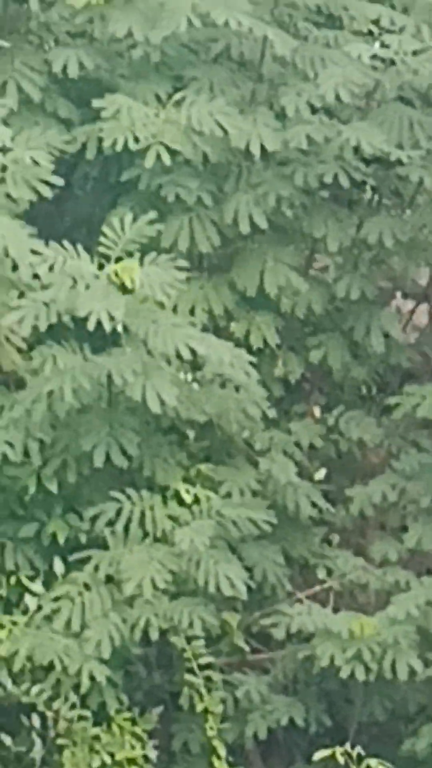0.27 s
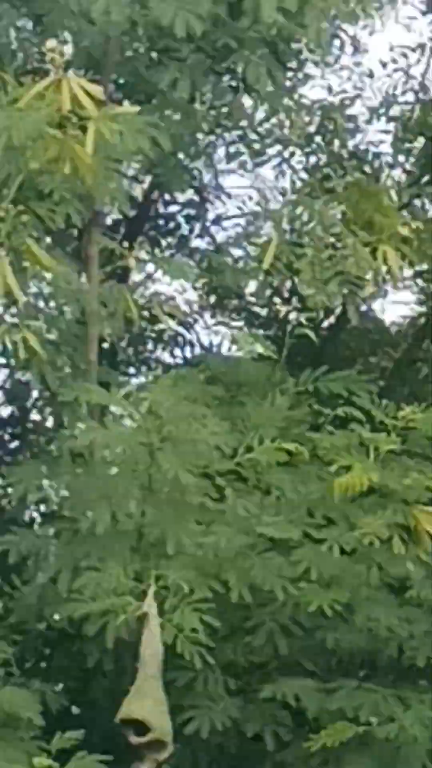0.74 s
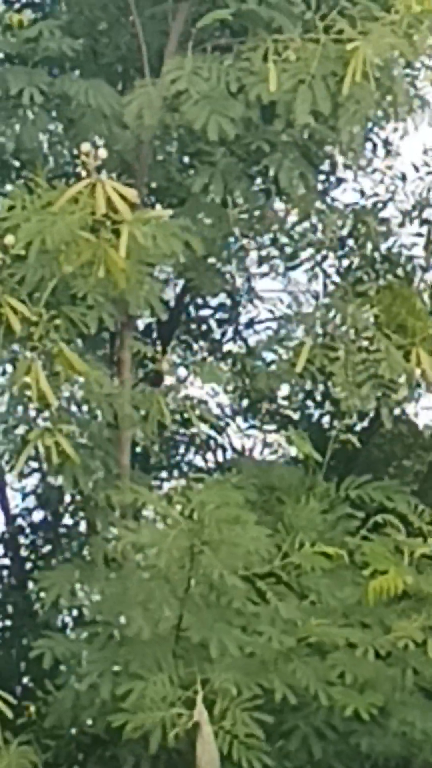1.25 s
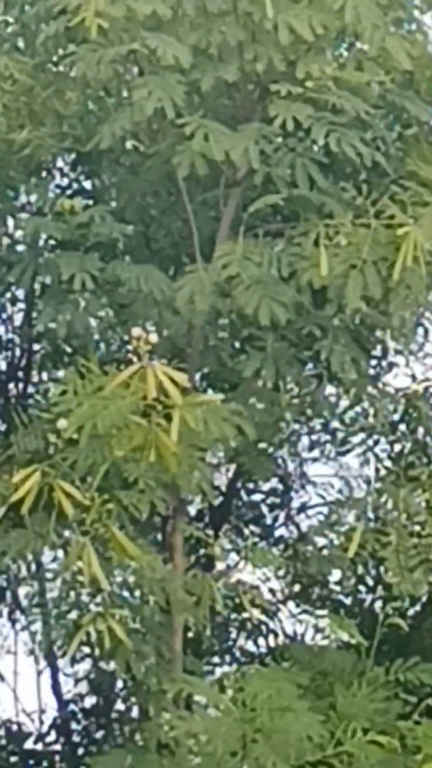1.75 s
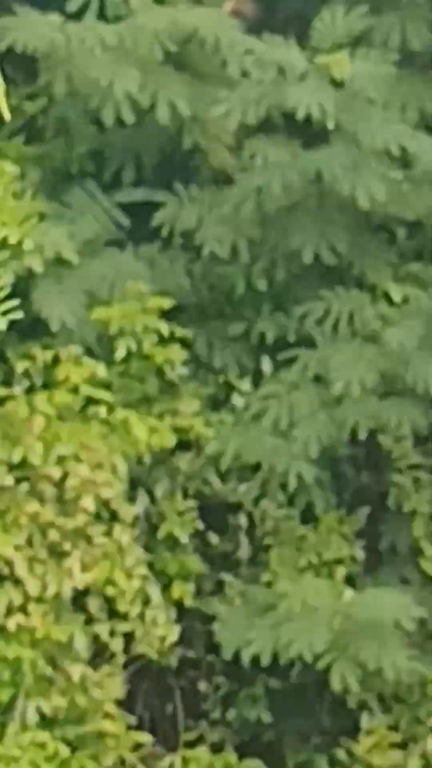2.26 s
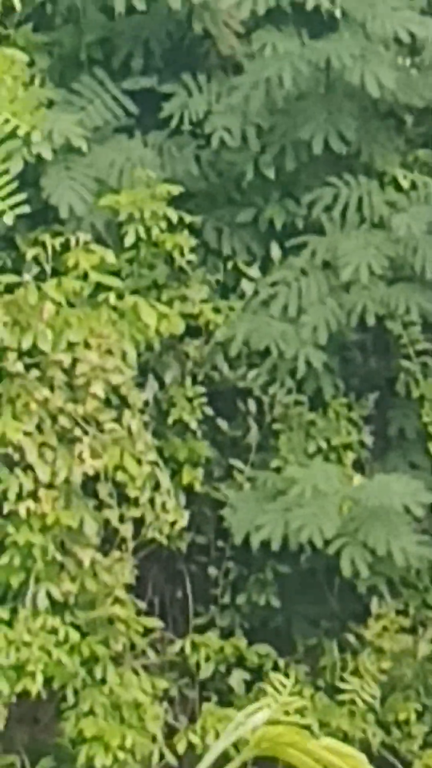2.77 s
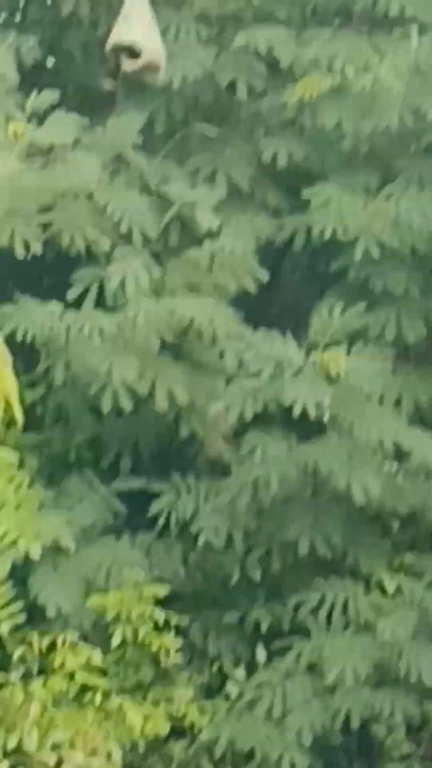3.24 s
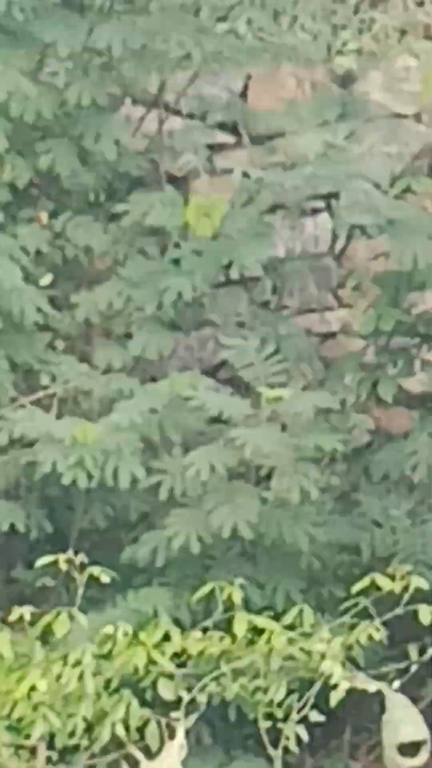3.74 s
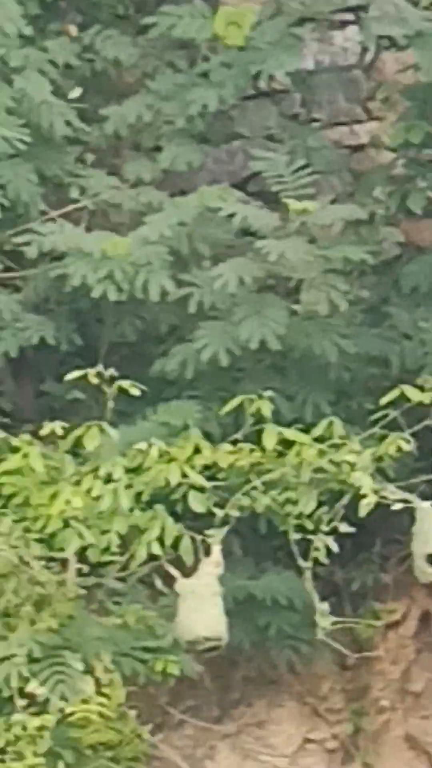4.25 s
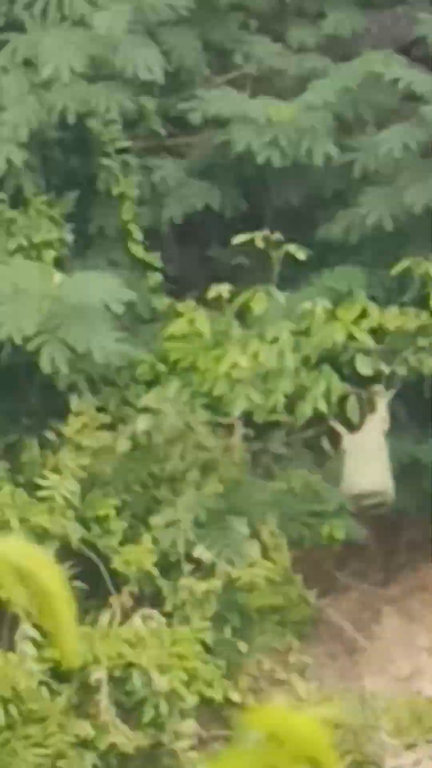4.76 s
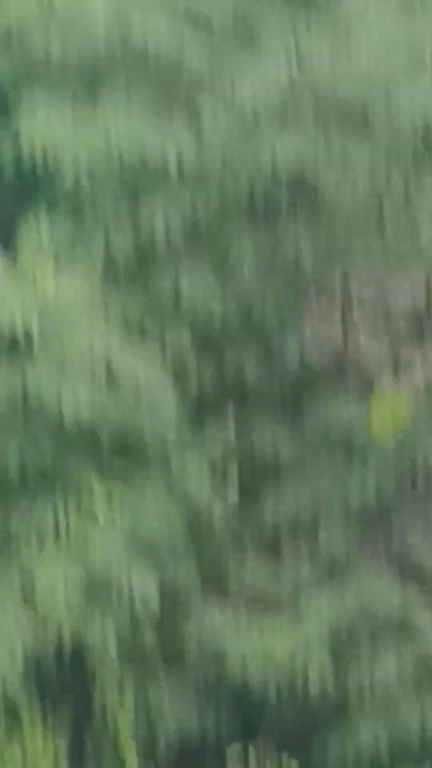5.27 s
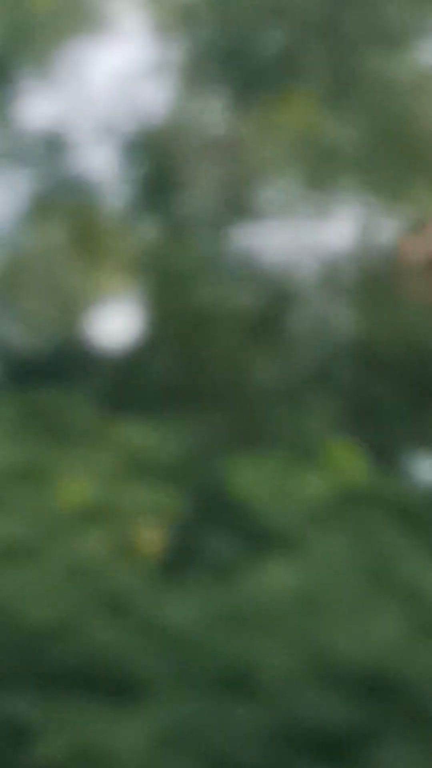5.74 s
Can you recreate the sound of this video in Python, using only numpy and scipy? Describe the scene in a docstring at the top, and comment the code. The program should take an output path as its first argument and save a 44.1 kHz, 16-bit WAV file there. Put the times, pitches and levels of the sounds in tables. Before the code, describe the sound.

Outdoors among leafy trees, a cicada, crickets and a hiss of far insects keep up a steady drone while weaver birds chirp a few metres away. The birds begin with fast trills, go on with short chips, then grow busier with sliding whistles and end on a rasping wheeze. The foliage softly scatters their calls. A low rumble lies behind, and there are two faint bumps and a tick right at the microphone.

```python
"""Small weaver birds chip, trill, whistle and buzz in a nesting tree, some metres from a mono phone mic.
Their notes are gliding tones with overtones; the buzz is the syrinx snapping and ringing the throat.
Higher in pitch, a cicada buckles its ribs in short runs and crickets pulse their wings. Leaves scatter
the calls. Behind lie the rest of the colony, a haze of far insects and a low distant rumble;
right at the mic, fingers bump and tick on the phone."""
import sys
import numpy as np
from scipy import signal
from scipy.fft import rfft, irfft
from scipy.io import wavfile
from scipy.ndimage import uniform_filter1d

SR = 44100
rng = np.random.default_rng(int(sys.argv[2]) if len(sys.argv) > 2 else 0)


def master(y):
    """Save y as 16-bit WAV."""
    cut = np.clip(np.atleast_2d(y).T, -1, 1)
    pcm = np.round(cut * 32767)  # scale
    wavfile.write(sys.argv[1], SR, pcm.astype(np.int16))


N = 264600
TIME = np.arange(N) / SR

# pitch of a chip, near or far: (time [share of its length], pitch [share of the way from end to top])
CHIP_CONTOUR = [(0, .1), (0.142, 0.98), (.28, 0.94), (0.451, .5), (0.699, .4), (1, 0.019)]


def undb(db):
    return 10 ** (np.asarray(db) / 20)


def level(x, db):
    return x * undb(db) / np.sqrt(np.mean(x ** 2))


def colour(x, points):
    """Filter by (frequency [Hz], gain [dB]) points joined on a log-frequency axis."""
    hz, db = np.transpose(points)
    bin_hz = np.arange(N // 2 + 1) * SR / N
    return irfft(rfft(x) * undb(np.interp(np.log(bin_hz + 1), np.log(hz), db)), N)


def resonance(x, hz, width_hz):
    return signal.lfilter(*signal.iirpeak(hz, hz / width_hz, SR), x)


def walk(rate):
    """Random values held 1 / rate s and smoothed twice; spread near 1."""
    hold = int(SR / rate)
    steps = np.repeat(rng.standard_normal(N // hold + 1), hold)
    return 1.331 * uniform_filter1d(uniform_filter1d(steps, hold), hold)[:N]


def add_note(out, start, hz, gain, second_db, third_db, fourth_db=-80):
    """Mix in a sine on the pitch curve with its second to fourth harmonics."""
    i = int(start * SR)
    phase = 2 * np.pi * np.cumsum(hz) / SR + i
    harmonics = enumerate((second_db, third_db, fourth_db), 2)
    overtones = sum(undb(db) * (k * hz < SR / 2) * np.sin(k * phase) for k, db in harmonics)
    note = gain * (np.sin(phase) + overtones)
    out[max(i, 0):i + len(note)] += note[max(-i, 0):N - i]


def sweeps(notes, contour, flutter_hz, rasp_db, second_db, fourth_over_third_db=0.5):
    """Rough glides from (time [s], level [dB], top [Hz], end [Hz], length [s], third harmonic [dB])."""
    out, flutter, rasp = np.zeros(N), walk(500), walk(350)
    for start, db, top, end, length, third_db in notes:
        progress = np.arange(max(int(length * SR), 8)) / (length * SR)
        at = (int(start * SR) + np.arange(len(progress))) % N
        height = uniform_filter1d(np.interp(progress, *np.transpose(contour)), size=60)
        hz = end + (top - end) * height + flutter_hz * flutter[at]
        gain = undb(db + rasp_db * rasp[at]) * np.sin(np.pi * np.clip(progress, 0, 1) ** 0.629)
        add_note(out, start, hz, gain, second_db, third_db, third_db + fourth_over_third_db)
    return out


def rumble():
    """Low noise from the distance, easing slightly."""
    # its spectrum: (frequency [Hz], relative level [dB])
    spectrum = [(15, -49), (25, -36.5), (55, -5.5), (96, 1.5), (208, -7), (243, -12), (395, -18.5),
                (654, -21), (859, -21), (1130, -24.5), (1980, -19.5), (2270, -25.5), (2600, -22.5),
                (3380, -60), (5720, -120)]
    # its slow fade: (time [s], level [dB])
    fade = [(0.0, -50), (6.0, -53)]
    return level(colour(rng.standard_normal(N), spectrum), 0) * undb(np.interp(TIME, *np.transpose(fade)))


def insect_haze():
    """Insects so far off that they blur into a steady hiss."""
    # their joint spectrum: (frequency [Hz], relative level [dB])
    spectrum = [(2000, -50), (2500, -52.5), (3000, -40), (5350, -76), (5800, 3), (6500, 0.5), (6850, -9),
                (7150, 7.5), (7500, -12.5), (8300, -18.5), (9400, -12), (10600, -29.5), (12800, -25.5),
                (15400, -26)]
    return level(colour(rng.standard_normal(N), spectrum), db=-44)


def flock(count, top_hz, spread_hz, end_hz, end_spread, third_db):
    """Many birds at once: overlapping random chips, rms 1."""
    when, loud, top, end, length = rng.random((count, 5)).T
    notes = np.transpose([(N / SR + .019) * when - .019, 5 * loud,
                          top_hz + spread_hz * top, end_hz * (1 + end_spread * end),
                          0.01993 + .04 * length, np.full(count, third_db)])
    return level(sweeps(notes, CHIP_CONTOUR, flutter_hz=202.2, rasp_db=2.0, second_db=-28), 0)


def colony():
    """High chatter and a lower murmur from further up the tree."""
    # swells of the far birds: (time [s], chatter level [dB], murmur level [dB])
    swells = [(0.0, -26.5, -41.5), (.07, -52.5, -48), (.16, -65.5, -56.5), (.19, -35, -44.5),
              (.53, -29.5, -47), (.72, -36, -53), (.92, -51, -62), (1.12, -52, -59.5), (1.3, -45, -46.5),
              (1.6, -53.5, -60), (1.9, -46.5, -77), (2.1, -68, -61.5), (2.3, -40.5, -46.5),
              (2.47, -59.5, -60), (2.54, -45.5, -48.5), (3.02, -39, -43.5), (3.33, -39, -48),
              (3.4, -46.5, -48), (3.46, -38.5, -51), (3.8, -39, -43), (4.05, -28.5, -42),
              (4.21, -39.5, -45), (4.3, -30.5, -38.5), (4.4, -34.5, -51.5), (4.48, -27, -47),
              (4.72, -45, -44.5), (4.85, -31, -42.5), (4.97, -44, -49.5), (5.17, -31, -50.5),
              (6.0, -32, -47)]
    times, chatter_db, murmur_db = np.transpose(swells)
    chatter = flock(count=1400, top_hz=4409, spread_hz=1100, end_hz=3122, end_spread=.45, third_db=-21)
    murmur = flock(count=1000, top_hz=3054, spread_hz=398.6, end_hz=2669, end_spread=.1348, third_db=-39)
    chatter *= undb(np.interp(TIME, times, chatter_db))
    murmur *= undb(np.interp(TIME, times, murmur_db))
    return chatter + murmur


def crickets():
    """Short wing-stroke tones in pairs, slightly rough."""
    # chirps of two strokes each: (time [s], level [dB])
    chirps = [(-.017, -43), (.0897, -44), (0.124, -45.5), (0.2338, -38.5), (0.377, -39.5), (.49, -43.5),
              (0.546, -46), (0.646, -41), (.806, -42), (.924, -47.5), (1.0974, -45), (1.177, -41.5),
              (1.242, -51), (1.344, -42), (1.384, -39), (1.492, -41), (1.636, -48), (1.796, -42),
              (1.913, -45), (2.049, -43.5), (2.218, -39), (2.367, -42.5), (2.558, -43), (2.697, -48),
              (2.853, -43), (2.9964, -38.5), (3.14, -38.5), (3.288, -40), (3.431, -44), (3.567, -41.5),
              (3.676, -42.5), (3.747, -40), (3.8545, -44), (3.94, -43), (3.996, -42.5), (4.137, -40.5),
              (4.2138, -40.5), (4.318, -45), (4.426, -45.5), (4.5705, -43), (4.708, -44), (4.92, -44.5),
              (5.03, -43), (5.09, -43.5), (5.175, -44), (5.2745, -42), (5.3478, -43.5), (5.458, -47),
              (5.528, -46), (5.6, -45), (5.742, -39.5), (5.847, -44), (5.9284, -46)]
    spacing_s, scatter_db = 0.0355, 3
    out, rough = np.zeros(N), undb(walk(200))
    envelope = signal.windows.tukey(int(0.0273 * SR), .6)
    for start, db in chirps:
        for at, (detune, size) in zip((start, start + spacing_s), rng.standard_normal((2, 2))):
            hz = 7150 + 40 * detune - np.linspace(-40, 40, len(envelope))
            add_note(out, at, hz, undb(db - scatter_db * size) * envelope, second_db=-20, third_db=-80)
    return out * rough


def chips():
    """Weavers in the tree call with a flick up in pitch and a slide down."""
    # chip calls: (time [s], level [dB], top pitch [Hz], end pitch [Hz], length [s])
    calls = [ (.009, -28.5, 5174, 2714, 0.061), (.364, -32.5, 4880, 2980, .052),
             (0.802, -41, 3600, 2470, 0.027), (.843, -27, 4440, 2860, 0.027),
             (0.951, -30.5, 6270, 4520, 0.031), (0.966, -29.5, 5340, 3020, .029),
             (1.215, -29.5, 5173, 2800, 0.053), (1.666, -28.5, 5055, 2704, .054),
             (1.788, -33, 4913, 2720, 0.085), (1.899, -31.5, 4920, 2655, 0.059),
             (2.191, -32, 4670, 3470, 0.053), (2.22, -33.5, 4600, 2617, 0.038),
             (2.295, -30, 5224, 3380, 0.041), (2.728, -60.5, 5290, 2830, .049),
             (2.882, -32, 4450, 2940, 0.065), (2.971, -29.5, 5080, 2940, 0.0605),
             (3.433, -29, 4816, 2860, 0.051), (3.503, -28, 5200, 3170, 0.078),
             (3.91, -33.5, 5290, 4140, 0.099), (5.203, -28, 5410, 3820, 0.043)]
    third_db = -22
    notes = [(*call, third_db) for call in calls]
    return sweeps(notes, CHIP_CONTOUR, flutter_hz=240, rasp_db=5.0, second_db=-19.5)


def cicada():
    """Each stroke buckles the ribs in turn: a short rising tick with a softer tail."""
    # bounds of the runs of even strokes; a run stops a short pause before the next: (time [s])
    runs = [ .0092, .056, .1155, .188, .2464, .3054, .3771, .4487, .534, .6064, .6906, .7505, .8097, .882,
            .9803, 1.1444, 1.2035, 1.2626, 1.3347, 1.408, 1.4782, 1.552, 1.611, 1.6684, 1.7286, 1.8, 1.8716,
            1.9319, 1.989, 2.0496, 2.1216, 2.193, 2.279, 2.3524, 2.424, 2.4703, 2.5686, 2.6402, 2.7266,
            2.837, 3.016, 3.0875, 3.16, 3.219, 3.2775, 3.3492, 3.423, 3.6666, 3.829, 3.9954, 4.0157, 4.271,
            4.3439, 4.4165, 4.49, 4.5614, 4.6217, 4.6812, 4.7646, 4.8394, 4.9507, 5.0092, 5.1483, 5.22,
            5.279, 5.3389, 5.3853, 5.4309, 5.5302, 5.6032, 5.6883, 5.7609, 5.8214, 5.8926, 5.952, 6.011]
    # the cicada's loudness: (time [s], level [dB])
    loudness = [(0.0, -45.5), (1.37, -47), (3.65, -42.5), (3.7, -60), (3.73, -42.5), (6.0, -47)]
    stroke_s, pause_s, scatter_db = .01312, .0197, 2.0
    out, t = np.zeros(N), np.arange(int(0.00735 * SR)) / SR
    envelope = np.interp(t, [.0008, .0027, .0042, .006, .0075], [0.677, 0.91, 0.38, 0.7, 0.1])
    for first, following in zip(runs, runs[1:]):
        last = following - pause_s
        for start in np.linspace(first, last, round((last - first) / stroke_s) + 1):
            size, detune = rng.standard_normal(2)
            hz = 5950 + 70 * detune + 750 * (t / t[-1]) ** 0.47
            add_note(out, start, hz, undb(scatter_db * size) * envelope, second_db=-30, third_db=-80)
    return level(out, 0) * undb(np.interp(TIME, *np.transpose(loudness)))


def scolds():
    """Harsh notes, rich in overtones, that sag a little in pitch."""
    # scolding calls: (time [s], level [dB], length [s], third harmonic [dB])
    calls = [(0.01, -30, 0.0337, -23), (0.352, -46, 0.0374, -5), (.832, -43, 0.038, -12),
             (0.943, -49, .033, -6), (1.216, -39, 0.041, -17), (1.676, -39.5, 0.037, -8),
             (1.81, -38.5, 0.062, -11.5), (1.908, -39.5, 0.044, -22.5), (2.295, -33, 0.025, -21.5),
             (2.965, -37, 0.078, -12.5), (3.506, -37, 0.037, -6), (4.016, -32, 0.0773, -17),
             (4.442, -25, 0.0772, -18), (4.54, -29.5, 0.053, -14.5), (5.06, -31, 0.0726, -18.5),
             (5.209, -31.5, 0.029, -21), (5.85, -30.5, 0.053, -16.5)]
    top_hz, end_hz = 3920, 3560
    notes = [(start, db, top_hz, end_hz, length, third_db) for start, db, length, third_db in calls]
    falling = [(0, 0.91), (1, 0.015)]
    return sweeps(notes, falling, flutter_hz=90, rasp_db=4.0, second_db=-15, fourth_over_third_db=2.5)


def trills():
    """Quick falling notes at a steady beat, each a little early or late, louder or softer."""
    # bursts of trilling: (first note [s], last note [s], level [dB], ends softer by [dB])
    bursts = [(.0234, .0744, -25, 0), (.178, .232, -22.5, 0), (.285, .688, -21.5, 3)]
    beat_s, jitter_s, scatter_db = .0252, 0.00101, 2
    top_hz, end_hz, length_s, third_db = 5200, 3900, .011, -32
    notes = []
    for first, last, db, ends_db in bursts:
        count = round((last - first) / beat_s) + 1
        for progress, (late, size) in zip(np.linspace(0, 1, count), rng.standard_normal((count, 2))):
            start = first + progress * (last - first) + jitter_s * late
            note_db = db - ends_db * (2 * progress - 1) ** 2 + scatter_db * size
            notes.append((start, note_db, top_hz, end_hz, length_s, third_db))
    return sweeps(notes, [(0, 0.82), (1, 0.029)], flutter_hz=30, rasp_db=3.5, second_db=-45)


def buzz():
    """A wheeze: irregular snaps of the syrinx ring the throat; their sharp edges fill the treble."""
    # buzzes: (start [s], end [s], body at start [dB], at end [dB], treble at start [dB], at end [dB])
    buzzes = [(0.243, 0.696, -45, -46, -59, -69.5), (5.06, 6.05, -43.5, -36.5, -53, -44)]
    # throat resonances: (frequency [Hz], width [Hz], relative level [dB])
    throat = [(4440, 200, -1), (5520, 400, 2), (4900, 800, -26)]
    # spectrum of the snaps' edges: (frequency [Hz], relative level [dB])
    edge_spectrum = [(7000, -34), (10400, -58), (11600, 11), (13500, 6), (15400, 2.5)]
    snaps_per_s, ramp_s = 1800, 0.01
    snaps = (rng.random(N) < snaps_per_s / SR) * rng.standard_normal(N)
    body = level(sum(level(resonance(snaps, hz, width), db) for hz, width, db in throat), 0)
    treble = level(colour(rng.standard_normal(N) + 3 * snaps, edge_spectrum), 0)
    out = np.zeros(N)
    for start, end, body_db, body_end_db, treble_db, treble_end_db in buzzes:
        gate = np.clip(np.minimum(TIME - start, end - TIME) / ramp_s, 0, 1)
        out += gate * body * undb(np.interp(TIME, [start, end], [body_db, body_end_db]))
        out += gate * treble * undb(np.interp(TIME, [start, end], [treble_db, treble_end_db]))
    return out


def whistles():
    """Near-pure glides that shimmer a little; overtones show while the pitch is falling fast."""
    # notes that hold a pitch, then ease towards another: (time [s], length [s], level [dB],
    # change by the end [dB], from [Hz], towards [Hz], hold [s], glide time constant [s])
    notes = [ (0.244, .05, -40, -20, 3200, 2916, 0, 0.017),
             (0.604, 0.098, -39, -5, 3590, 3054, 0.0036, 0.023),
             (0.714, 0.092, -41.5, 6, 2885, 3950, 0.0018, 0.0106),
             (0.727, 0.13, -41.5, 11, 4680, 3955, 0.0014, 0.083),
             (1.475, 0.088, -37, -6, 2970, 4150, 0, 0.012),
             (2.265, 0.1085, -36.5, -6, 3920, 3240, .045, 0.0465),
             (3.377, 0.09, -52, -2, 2910, 1000, 0.0033, 0.094),
             (3.557, 0.19, -33, -4.5, 4440, 4268, 0.013, 0.033),
             (3.977, 0.224, -31, -8, 5104, 4200, 0, 0.037),
             (4.254, 0.399, -33, 4.5, 5203, 4243, 0.0045, 0.033),
             (4.3, .13, -36.5, -2, 6200, 5308, 0.0092, .18), (4.396, 0.076, -38, 11, 3980, 3870, 0, 0.046),
             (4.468, .5, -35, -17, 3870, 2697, 0.00027, 0.11),
             (4.503, 0.35, -28.5, -14.5, 3860, 2755, 0.025, .17),
             (4.797, 0.159, -29, 1, 5214, 4056, 0.00039, .03),
             (4.941, .41, -31.5, -13.5, 4072, 2824, 0.0018, .15),
             (5.001, 0.033, -41, -1, 2600, 1887, 0, 0.0423), (5.22, .8, -38.5, 0, 4410, 4450, .05, .15),
             (5.218, 0.16, -33.5, -1.5, 4230, 3810, 0.018, 0.033),
             (5.386, 0.19, -29.5, -13.5, 3880, 2330, 0.0066, .14),
             (5.678, 0.114, -43, -18.5, 3070, 596.6, 0.018, 0.11)]
    attack_s, release_s = 0.00755, 0.0272
    out, shimmer, waver_hz = np.zeros(N), undb(3.5 * walk(220)), 35 * walk(300)
    for start, length, db, change_db, from_hz, to_hz, hold, glide in notes:
        span = slice(int(start * SR), int((start + length) * SR))
        t = TIME[span] - start
        pitch = to_hz + (from_hz - to_hz) * np.exp(-np.clip(t - hold, 0, None) / glide)
        falling = uniform_filter1d(np.clip(-np.gradient(pitch) * SR / 3500, 0, 1), size=600)
        envelope = np.clip(np.minimum(t / attack_s, (length - t) / release_s), 0, 1)
        gain = np.sqrt(2) * undb(db + change_db * t / length) * envelope * shimmer[span]
        add_note(out, start, pitch + waver_hz[span], gain,
                 second_db=-38 + 8 * falling, third_db=-40 + 17 * falling)
    return out


def far_bird():
    """A deeper-voiced bird far from the mic gives soft, hoarse, falling notes."""
    # its calls: (time [s], level [dB], pitch [Hz])
    calls = [(0.6399, -56.5, 1940), (0.7317, -59, 1920), (1.493, -60, 1980), (2.2812, -58, 1920),
             (2.9524, -59, 1820), (3.249, -57, 1890), (3.7813, -56, 2120), (3.9614, -52, 2030),
             (4.1096, -50.5, 2030), (4.2657, -50.5, 2034), (4.467, -56.5, 1920), (4.6444, -56, 1940),
             (4.7536, -50.5, 2020), (5.0976, -56, 1980), (5.3582, -66.5, 2110)]
    length_s, third_db = .06, -45
    notes = [(start, db, 1.06 * hz, .92 * hz, length_s, third_db) for start, db, hz in calls]
    return sweeps(notes, [(0, 0.963), (1, 0)], flutter_hz=141.4, rasp_db=5.0, second_db=-50)


def handling():
    """Fingers on the phone: short noise bursts through a broad case resonance."""
    # dull bumps: (time [s], peak level [dB], resonance [Hz], decay [s])
    bumps = [(1.3, -41, 167, 0.038), (2.65, -39, 166, 0.037)]
    out = np.zeros(N)
    for start, db, hz, decay in bumps:
        i, t = int(start * SR), np.arange(int(8 * decay * SR)) / SR
        burst = resonance(rng.standard_normal(len(t)) * np.exp(-t / decay), hz, width_hz=hz)
        out[i:i + len(t)] += burst * undb(db) / np.max(np.abs(burst))
    return out


def finger_tick():
    """A finger ticks on the phone: one damped click right at the mic."""
    # the impulse that excites the click: (time [s], level [dB])
    taps = [(3.472, -8)]
    (start, db), = taps
    impulse = np.zeros(N)
    impulse[int(start * SR)] = undb(db)
    return resonance(impulse, hz=1070, width_hz=820)


def leaves(x):
    """Through the foliage to the mic: the direct sound, a near echo and a dense fading scatter."""
    t60_s, build_s, scatter_db = 0.281, 0.0088, 0.5
    echo_s, echo_db = 0.0042, -6.5
    t = np.arange(int(.6 * SR)) / SR
    response = rng.standard_normal(len(t)) * undb(-60 * t / t60_s) * np.clip(t / build_s, 0, 1)
    response *= undb(scatter_db) / np.sqrt(np.sum(response ** 2))
    response[[0, int(echo_s * SR)]] = 1, undb(echo_db)
    return signal.fftconvolve(x, response)[:N]


def scene():
    """The tree and its surroundings from one mic position, alike in both channels."""
    # tone colour of the beak: (frequency [Hz], gain [dB])
    beak = [(1500, 0), (2500, -7), (3000, -0.5), (5500, -2), (8000, -0.5), (10500, -6.5), (13000, -1),
            (15300, 2.5)]
    chipping, trilling = chips(), trills()
    birds = colour(chipping + scolds() + colony(), beak) + buzz() + far_bird()
    insects = cicada() + crickets()
    background = rumble() + insect_haze()
    song = colour(whistles(), beak)
    birds += undb(-5) * trilling + undb(-2.5) * song
    # trills and whistles sound drier and clearer, with less echo than the other bird calls
    direct = undb(-10) * song + undb(-9) * trilling + insects
    scattered = undb(-4.5) * leaves(birds) + undb(-15.5) * leaves(insects)
    mono = direct + scattered + background + handling() + finger_tick()
    return np.array([mono, mono])


def record(dry):
    """The phone cuts the top steeply."""
    top_hz = 15570
    return signal.sosfilt(signal.ellip(12, .2, 80, top_hz, fs=SR, output="sos"), dry)


dry = scene()
out = record(dry)
master(out)
```